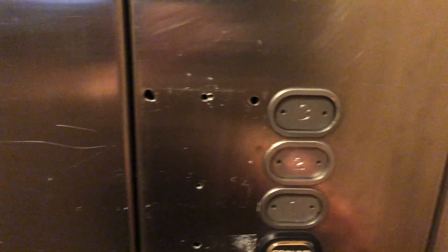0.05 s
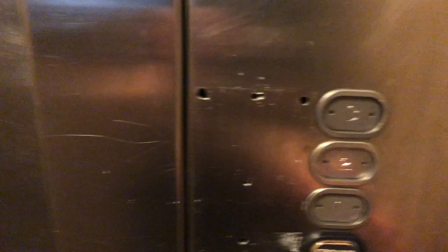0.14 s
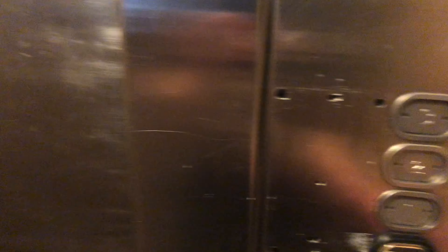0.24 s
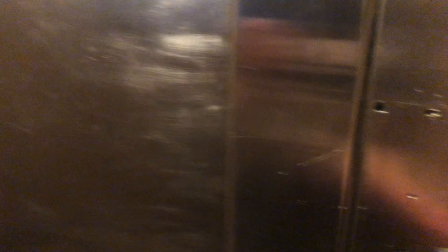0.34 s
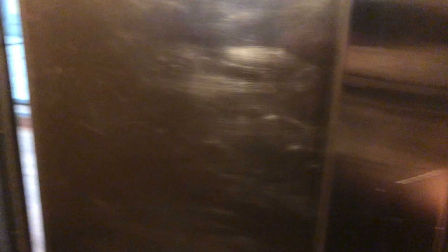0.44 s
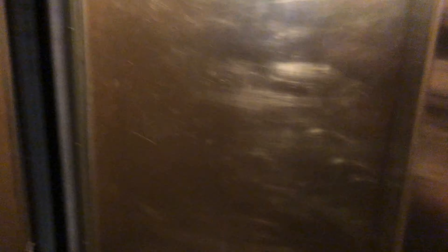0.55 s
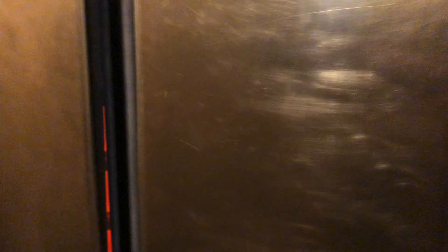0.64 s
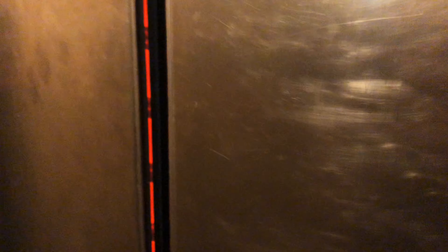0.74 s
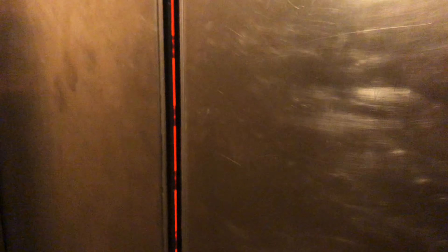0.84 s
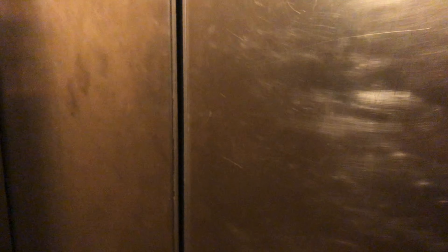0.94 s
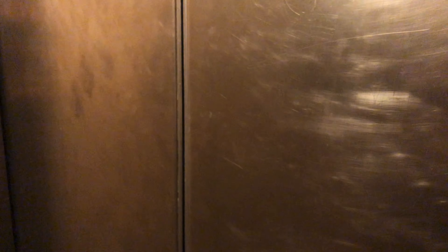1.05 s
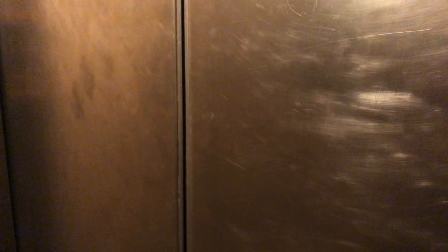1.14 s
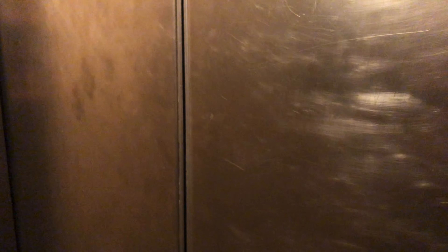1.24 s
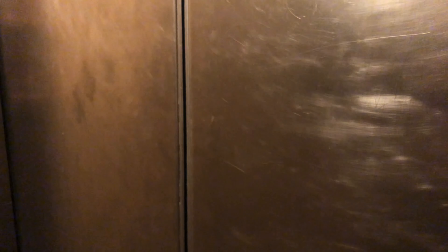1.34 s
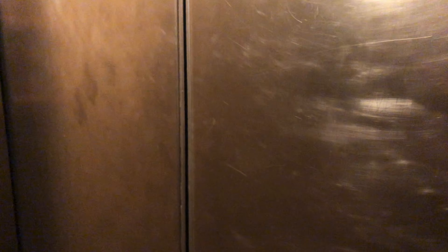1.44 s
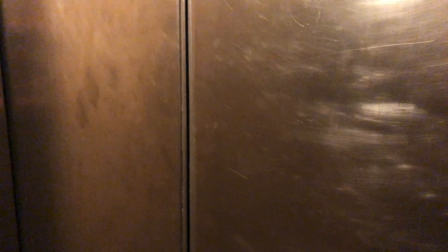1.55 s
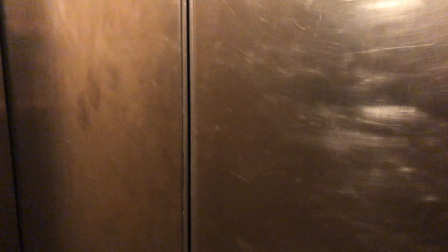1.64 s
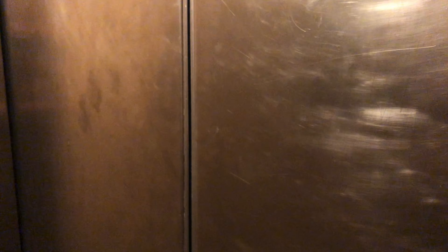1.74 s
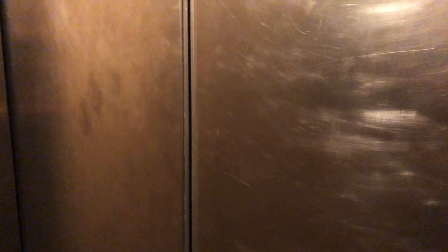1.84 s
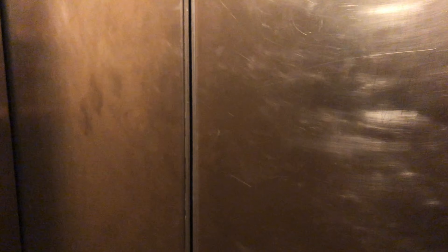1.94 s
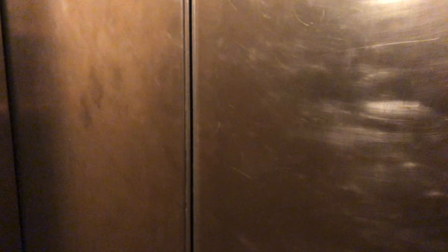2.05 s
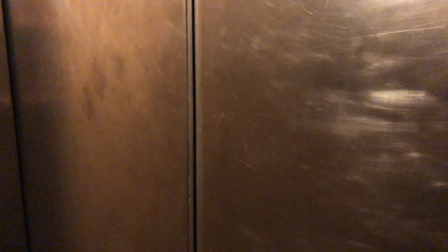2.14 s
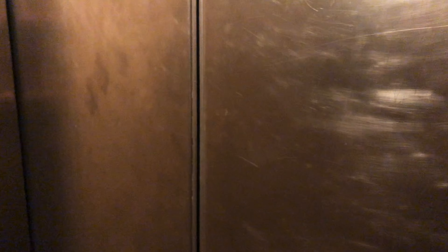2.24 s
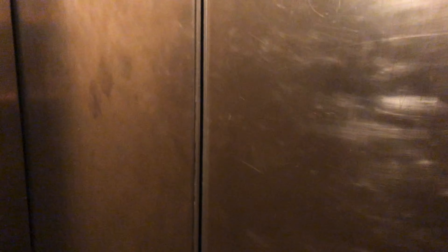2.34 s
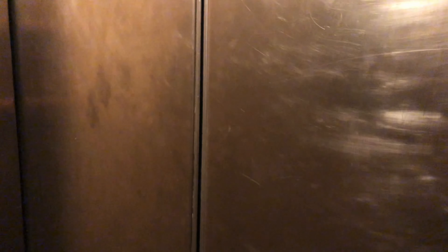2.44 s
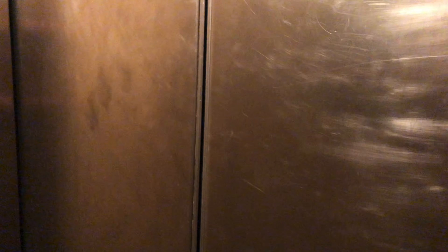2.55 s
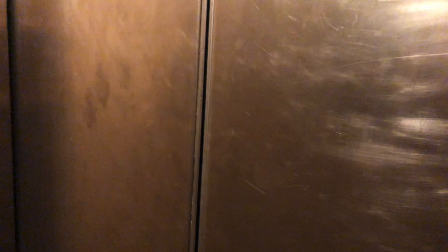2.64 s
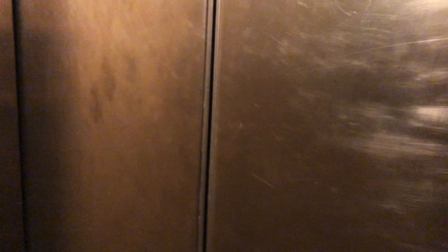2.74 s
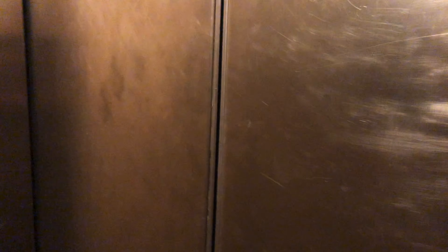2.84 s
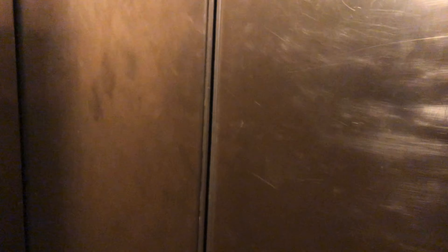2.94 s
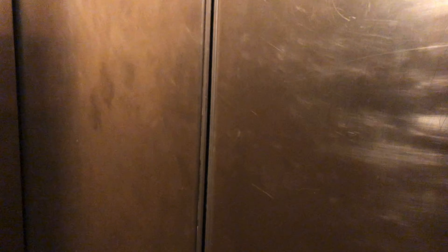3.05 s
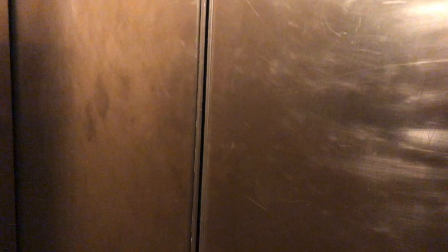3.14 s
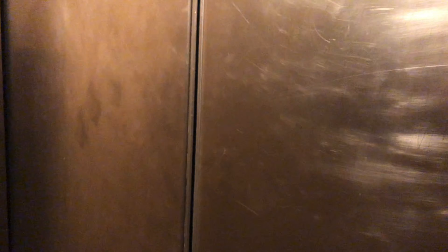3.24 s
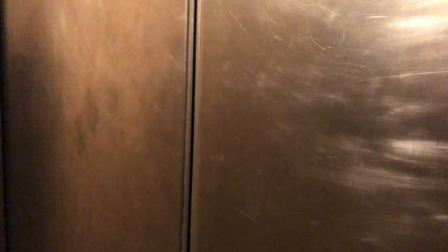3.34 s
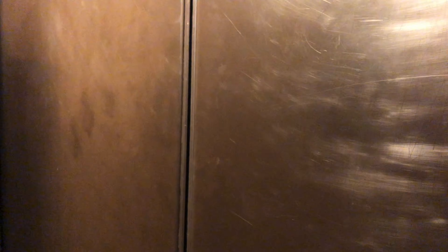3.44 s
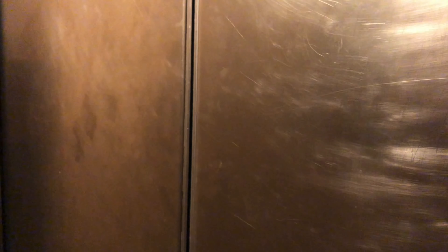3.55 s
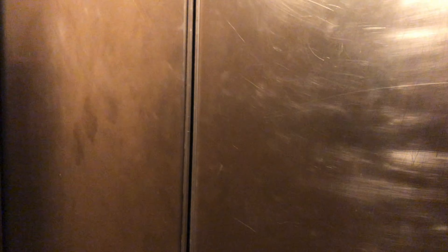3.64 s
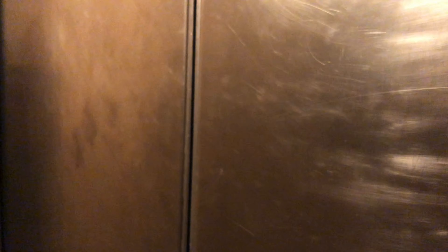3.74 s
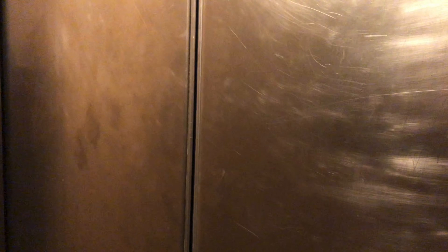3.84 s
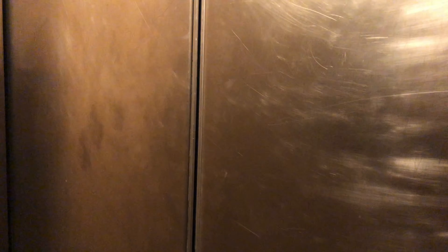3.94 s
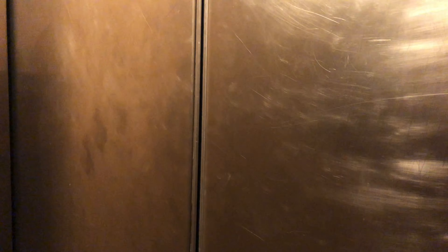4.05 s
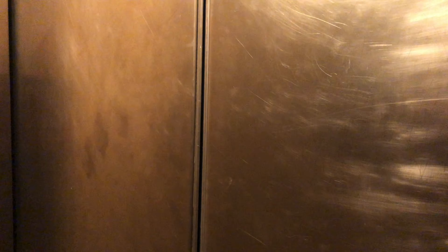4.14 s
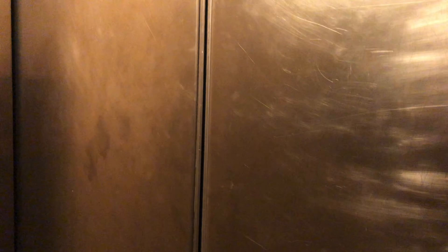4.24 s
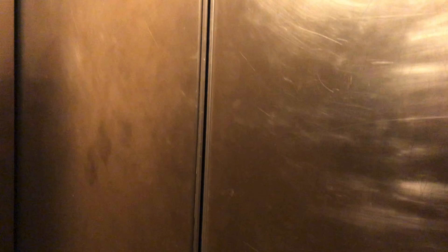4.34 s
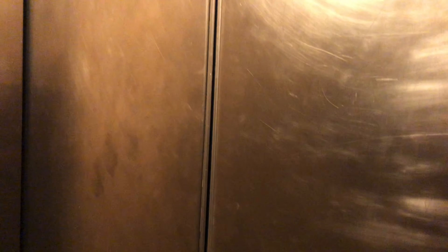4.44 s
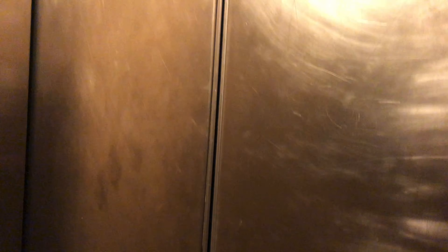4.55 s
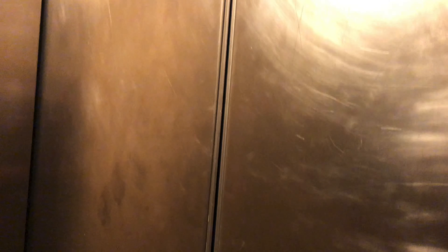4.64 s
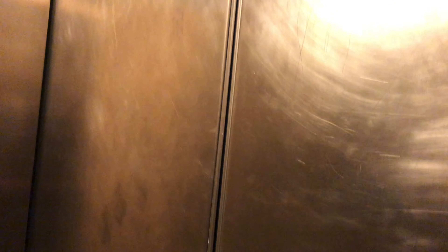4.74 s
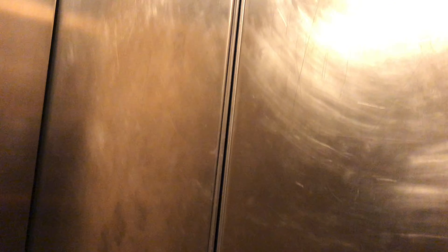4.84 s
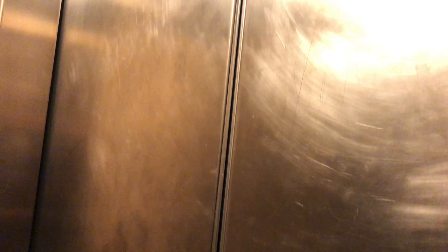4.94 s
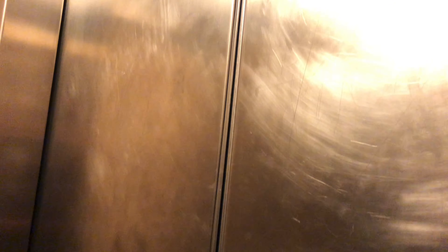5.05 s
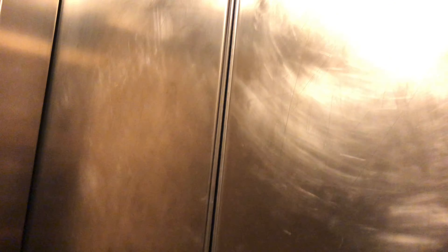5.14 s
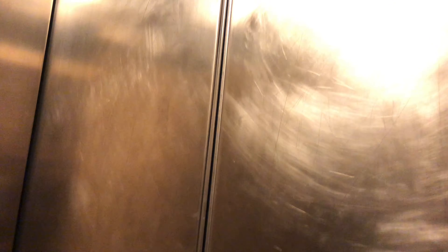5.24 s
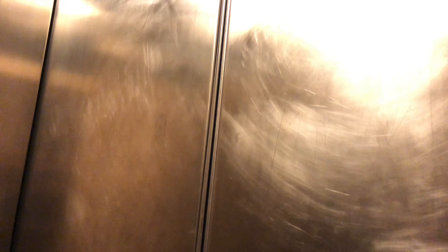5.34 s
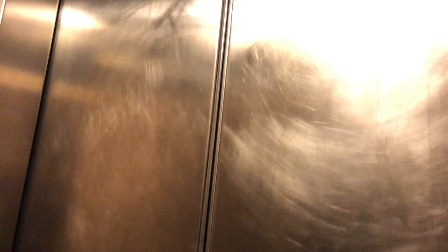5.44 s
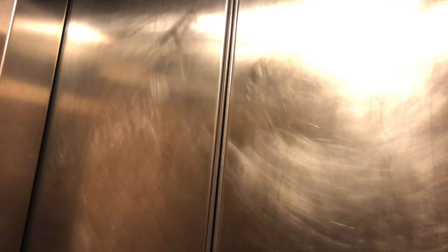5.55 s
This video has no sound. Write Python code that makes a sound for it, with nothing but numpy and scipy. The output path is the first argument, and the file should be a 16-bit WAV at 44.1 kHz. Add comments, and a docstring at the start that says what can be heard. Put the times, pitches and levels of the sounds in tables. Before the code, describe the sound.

Inside a small steel lift car, mono and close. From the start a sliding door rumbles with hollow boom, roller noise, track hiss and a faint belt note that peaks around 0.8 s. Metallic knocks and a catch snap fall at 0.1-0.5 s; light lever rattle begins at 0.9 s, the heaviest thump with a dry tick lands near 1.05 s, and bright snaps and clacks run from 1.16 to 1.4 s as it shuts. The rumble and motor hiss die away by about 2.5 s, with faint clicks and dull shaft thumps around 1.9-2.2 s. Quiet ventilation, wavering low hum and a very thin high whine remain, with a soft drone swelling near 2.8 and 3.3 s. An echoing switch click sounds at 3.2 s, a weaker clicking cluster with a thump at 3.4-3.65 s. At 4.4-4.7 s a distant metal scrape swells and rings. Low hum returns; a barely audible squeak starts at 5.5 s.

```python
"""A sliding steel lift door rumbles along its track, clicks, bumps shut; its catch snaps and rattles.
The door's running noise is coloured noise plus a belt tone; its blows are noise shaped by steel resonances,
with fading sine modes. Outside, switchgear clicks, thumps and scrapes echo in the shaft, and something
squeaks faintly at the end. Inside the car: ventilation noise, hum lines and a thin swept electrical whine."""
import sys
import numpy as np
from scipy import signal
from scipy.fft import rfft, irfft, next_fast_len
from scipy.io import wavfile
from scipy.ndimage import map_coordinates

SR = 44100
rng = np.random.default_rng(int(sys.argv[2]) if len(sys.argv) > 2 else 0)


def log_audio(samples):
    """Write samples as a 16-bit WAV file to the path given in sys.argv[1]."""
    # one column per channel
    frames = np.atleast_2d(samples).T
    # limit to full scale, then quantise
    limited = np.clip(frames, -1, 1)
    pcm = np.round(limited * 32767).astype(np.int16)
    wavfile.write(sys.argv[1], SR, pcm)


N = 246939
NOW_S = np.arange(N) / SR
AGE_S = np.arange(SR + SR // 2) / SR  # time since a blow
BLOW_HZ = np.fft.rfftfreq(len(AGE_S), 1 / SR)

# Noise colours, relative: (frequency [Hz], level [dB per Hz])
# ventilation
VENTILATION_COLOUR = [(22, -17.5), (49, -1.5), (87, 3), (147, -2.5), (217, -4.5), (250, -10), (356, -12),
                      (560, -17), (885, -24.5), (2260, -35.5), (9200, -45.5), (16000, -47.5)]
# door panel boom
BOOM_COLOUR = [(22, -41), (38, -16), (55, 6.5), (68, 4), (110, -15), (160, -59), (400, -86)]
# door rollers
ROLLER_COLOUR = [(60, -4), (120, 0.5), (150, 9.5), (185, -6.5), (220, 7), (260, -1), (440, -2.5),
                 (700, -9.5), (1000, -16), (2200, -91)]
# hiss on the track
TRACK_COLOUR = [(400, -23), (620, -7), (1200, 1), (1500, -3.5), (2050, -6), (2500, -8.5), (5000, -16),
                (7500, -25), (11000, -23), (12000, -32), (13000, -25), (16000, -30)]
# far strokes, before the rail resonances
STROKE_COLOUR = [(100, -16), (220, -2), (370, 12), (600, 5), (950, 1.5), (1300, -5), (2400, -5),
                 (4000, -2.5), (8000, 0.5), (15000, -1.5)]

# Resonances, relative to a flat base: (frequency [Hz], width [Hz], level [dB])
# door leaf
LEAF_PEAKS = [(430, 120, -1.5), (875, 29, 13.5), (1160, 69, 10.5), (1310, 85, 3), (1860, 480, 5),
              (2450, 1200, -1.5), (3360, 160, 4), (4040, 200, 5.5), (6060, 105, 7)]
# switchgear casing
CASING_PEAKS = [(880, 150, 0), (1326, 88, 3.5), (1800, 220, -2), (2800, 310, -5), (3660, 270, -1)]
# switchgear contact spring
SPRING_PEAKS = [(11400, 810, 1)]
# shaft rails
RAIL_PEAKS = [(870, 25, 1.5), (1080, 17, 3), (1455, 17, 9), (1587, 23, 11.5), (1890, 35, 7), (2120, 30, -1),
              (2276, 12, 9.5), (2396, 27, 7), (2570, 23, 7), (2780, 120, 3.5), (2970, 26, 3),
              (3395, 17, 10.5), (3490, 25, 10), (3800, 50, 1), (4130, 34, 3), (5700, 160, -4)]

# Ringing modes: (frequency [Hz], relative level [dB], t60 [s])
# steel catch
CATCH_MODES = [(3310, -3, 0.27), (3670, -3, 0.15), (8120, 6, 0.12), (8550, 6, 0.12), (9630, 0.5, 0.099),
               (11750, 0, 0.09)]
# light lever
LEVER_MODES = [(5100, -7, 0.071), (5600, 1, .13), (5610, 4.5, 0.13), (6000, -6, 0.13), (7770, -3.5, 0.15),
               (9450, 1, 0.096), (14600, -14, .15)]

# Decay times: (frequency [Hz], t60 [s])
# inside the car
CAR_T60 = [(100, 0.061), (500, 1), (2000, 0.2), (6000, 0.22), (14000, 0.13)]
# in the shaft
SHAFT_T60 = [(150, 1.08), (1500, 0.9), (3400, 0.73), (4600, 0.62), (7000, 0.42), (14000, 0.2)]

# steady hum lines: (frequency [Hz], level [dB])
HUM_LINES = [(86.1, -62.5), (212, -62.5), (495, -72), (860, -78.5)]
# spells of stronger hum: (start [s], end [s], frequency [Hz], level [dB])
HUM_SPELLS = [(1.8, 2.414, 219, -54.5), (2.0, 2.41, 487.5, -65.5), (4.64, 4.845, 218.2, -57),
              (4.996, 5.403, 206.2, -57.5)]
# slow swells of drone from the car walls: (time [s], level [dB])
DRONES = [(2.83, -53), (3.28, -47), (3.87, -58.5)]
# faint squeak, second and third partial only: (time [s], fundamental [Hz], level per partial [dB])
SQUEAK = (5.525, 975, -76.5)
# drawn-out strokes far along the shaft:
# (time [s], level [dB], rise [s], hold [s], top [Hz], rail ring share [gain], strongest near [Hz])
STROKES = [(1.979, -47, 0.011, 0.097, 1130, 0.91, 367), (2.17, -56, 0.023, 0.055, 1100, 0.5, 556),
           (3.634, -49.5, 0.014, 0.021, 1500, 0.54, 930), (4.394, -47.5, 0.045, 0.076, 1990, 0.77, 1670),
           (4.477, -37, 0.11, 0.063, 8500, 1.27, 2270)]
# switchgear clicks: (time [s], level [dB], hardness [dB], armature ring [Hz], relative ring level [dB])
GEAR_CLICKS = [(1.912, -64, -16.5, 4140, -11), (1.972, -65, -6, 4060, -6), (3.190, -43, 2.5, 4140, 4),
               (3.443, -64, 5.5, 3980, 5), (3.587, -67.5, 6.5, 4440, 2), (3.625, -56.5, 5, 4290, 10),
               (3.629, -49, -10, 4190, 1), (3.655, -54.5, 1.5, 4460, 4.5)]
# door leaf on its track and frame: (time [s], level [dB], hardness [dB])
KNOCKS = [(0.105, -52, -10.5), (0.178, -42.5, 0.5), (0.375, -45.5, -9.5), (0.470, -49, 10),
          (0.487, -40.5, 3), (0.714, -52.5, -2), (1.021, -52.5, -12), (1.04, -50.5, -20),
          (1.060, -34.5, 5.5), (1.323, -41, 2), (1.356, -40.5, -3)]
# catch snaps: (time [s], level [dB], ring against the clack [dB], rise [s])
CATCH_SNAPS = [(0.374, -37.5, -2.5, 0.0014), (1.160, -34.5, -5.5, 0.00046), (1.281, -39, -11, 0.0028)]
# lever rattle: (time [s], level [dB], ring against the clack [dB], rise [s])
LEVER_TAPS = [(0.914, -49, -9, 0.0054), (0.949, -45.5, -17, 0.00064), (1.003, -52, -16, 0.0049),
              (1.250, -39.5, -3.5, 0.0016), (1.352, -50.5, 3.5, 0.00062), (1.394, -52, -3, 0.00085)]
# single-pitch rings and thumps of the door, sounding with the knocks and lever taps:
# (time [s], level [dB], frequency [Hz], t60 [s])
DOOR_RINGS = [(0.488, -42.5, 3520, .24), (0.948, -46, 7800, .14), (1.046, -28, 322, 0.052),
              (1.324, -28.5, 2260, 0.038), (1.330, -29, 427.5, .11)]
# dry tick close by: (time [s], level [dB], t60 [s])
TICK = (1.0385, -33.5, .018)
# hollow door shaking, getting going and shutting: (time [s], length [s], boom [dB], rumble [dB])
SHAKES = [(0.053, 0.37, -41.5, -71), (1.162, 0.18, -42, -38.5)]
# thin motor hiss as it pulls away: (centre [Hz], level [dB], full until [s])
PULL_AWAY_HISS = (11900, -73, .4)

# Contact character against the clack: (thud [dB], crack [dB])
# door leaf
LEAF_TOUCH = (-5, -11.5)
# catch
CATCH_TOUCH = (-15, 2.8)
# lever
LEVER_TOUCH = (-14, -0.73)
# switchgear
GEAR_TOUCH = (-8, -5.5)

TOP_HZ = 15950
MAINS_HZ, WHINE_HZ, WHINE_DB = 50, 10335, -78.5
SWEEP_HZ = 100  # whine pitch swing either way in each mains cycle
WALL_DELAY_S, DRIFT_KNOTS_PER_S = 0.008, 2.2
SPELL_RISE_S, SPELL_T60_S = 0.019, 0.55
DRONE_WIDTH_S = 0.14
RUSTLE_S, RUSTLE_DB, RUSTLE_WIDTH_S = 2.73, -71.5, 0.32
FOCUS_WIDTH_HZ, FOCUS_DB = 280, 7  # band each stroke excites most
SPILL_DB = -12  # soft contact: shelf reaching an octave above its top
CASING_TILT = 0.53  # dB the lowest modes lose per dB of hardness
ARMATURE_WIDTH_HZ = 210
ARMATURE_DB, ARMATURE_T60_S, ARMATURE_RISE_S = -5.5, 0.42, 0.008
KNOCK_RISE_S, GEAR_RISE_S = 0.00253, 0.00275  # strongest of each kind
SOFTEN_DB = 99  # a blow this much weaker takes one more rise time
LEAF_DIRECT, LATCH_DIRECT, GEAR_DIRECT = 0.9, 1.25, 0.32  # extra gain at the onset
DOOR_RING_RISE_S, DOOR_RING_BLUR_RAD = 0.003, 1.3
ROLL_DB, HISS_DB, DRIVE_DB = -44, -53, -65.5
RECEDE_DB_PER_S, HISS_RECEDE_DB_PER_S = 3.5, 4  # running gear moves away along the track
STOP_S, STOP_T60_S = 1.3, 1.55
PRESS_DB, MOTOR_OFF_S, MOTOR_T60_S = -64.5, 1.88, 0.92  # motor hisses on, pressing the door shut, until cut
DRIVE_HZ, SPEED_UP_HZ = 1750, 150
FASTEST_S, FAST_WIDTH_S, FASTEST_DB = 0.77, 0.35, 3  # belt highest and loudest in mid-travel
DRIVE_WIDTH_HZ, DRIVE_RASP_DB = 380, 5.5  # rasp around the belt note, level against the note
SHAKE_RISE_S, SHAKE_T60_S = 0.01, 0.99


def amp(db):
    """Decibels to gain."""
    return 10 ** (np.asarray(db) / 20)


def unit(x):
    """Scale to rms 1."""
    return x / np.sqrt(np.mean(x ** 2) + 1e-20)


def along(points, hz):
    """(Hz, value) points interpolated on a log-frequency axis."""
    point_hz, values = np.transpose(points)
    return np.interp(np.log(hz + 1), np.log(point_hz), values)


def wobble(knots_per_s, size=N):
    """Smooth random curve through normally distributed knots."""
    coarse = np.arange(0, size + 64, 64)
    knots = rng.standard_normal(4096)
    curve = map_coordinates(knots, [coarse * knots_per_s / SR], mode="mirror")
    return np.interp(np.arange(size), coarse, curve)


def filtered(x, response):
    """Multiply the spectrum of x by a response of frequency."""
    padded = next_fast_len(len(x) + 4096)
    gain = response(np.fft.rfftfreq(padded, 1 / SR))
    return irfft(rfft(x, padded) * gain, padded)[:len(x)]


def noise(colour, size=N):
    """Noise of rms 1 with a (Hz, dB) colour."""
    return unit(filtered(rng.standard_normal(size), lambda hz: amp(along(colour, hz))))


def tone(hz, blur_rad):
    """Line of rms 1 whose wavering phase smears it into a narrow band."""
    phase = 2 * np.pi * np.cumsum(hz * np.ones(N)) / SR
    return np.sqrt(2) * np.sin(phase + blur_rad * wobble(110))


def band(hz, width_hz):
    """Narrow noise band of rms 1 around a pitch that may move."""
    phase = 2 * np.pi * np.cumsum(hz * np.ones(N)) / SR
    return unit(wobble(width_hz) * np.cos(phase) + wobble(width_hz) * np.sin(phase))


def add(track, time_s, sound):
    """Mix a sound into the track."""
    part = track[max(round(time_s * SR), 0):][:len(sound)]
    part += sound[:len(part)]


def swell(rise_s):
    """Contact builds up exponentially, with the rise as time constant."""
    return 1 - np.exp(-AGE_S / max(rise_s, 1e-4))


def direct(boost):
    """First milliseconds arrive straight from the contact, above the reverberation."""
    return 1 + boost * np.exp(-AGE_S / 0.0017)


def release(end_s, t60_s):
    """Full level until the end, then a steady fall in dB."""
    return amp(-60 * np.maximum(NOW_S - end_s, 0) / t60_s)


def gate(start_s, end_s, rise_s, t60_s):
    """Attack from the start, hold until the end, then release."""
    attack = 1 - np.exp(-np.maximum(NOW_S - start_s, 0) / max(rise_s, 1e-4))
    return attack * release(end_s, t60_s)


def hump(peak_s, width_s):
    """Smooth rise and fall."""
    return np.exp(-((NOW_S - peak_s) / width_s) ** 2)


def resonances(peaks, hz, base):
    """Gain of (Hz, width, dB) peaks added in power to a flat base."""
    power = base ** 2
    for centre_hz, width_hz, db in peaks:
        power = power + amp(2 * db) / (1 + (2 * (hz - centre_hz) / width_hz) ** 2)
    return np.sqrt(power)


def dense_modes(spacing_hz, depth_db):
    """Close random peaks and dips of one sheet-metal part, as gain over frequency."""
    knots = rng.standard_normal(1024)
    return amp(depth_db * map_coordinates(knots, [BLOW_HZ / spacing_hz], mode="mirror"))


def levels(touch, db, hardness_db=0):
    """Clack, thud and crack levels in dB: hard contact trades thud for crack."""
    thud_db, crack_db = touch
    return db, db + thud_db - hardness_db, db + crack_db + hardness_db


def slowness(rows, db):
    """Rise factor: the weaker a blow among its kind, the softer its attack."""
    strongest_db = max(row[1] for row in rows)
    return 1 + (strongest_db - db) / SOFTEN_DB


def blow(clack_db, thud_db, crack_db, body, sheet):
    """Dense vibration of struck metal: low thud, mid clack coloured by the body, bright crack."""
    thud_colour = [(40, -7), (130, 2.0), (450, -6.5), (750, -11.5), (3000, -29.5)]
    clack_colour = [(250, -46), (900, -2), (2500, 6.0), (5500, -1.0), (8000, -5.5), (16000, -48)]
    crack_colour = [(1500, -61), (5000, -3.5), (7200, -7.5), (8400, -2.5), (11500, -5.0),
                    (13000, -9), (16000, -9.5)]
    thud = unit(amp(along(thud_colour, BLOW_HZ)))
    clack = unit(sheet * body(BLOW_HZ) * amp(along(clack_colour, BLOW_HZ)))
    crack = unit(sheet * amp(along(crack_colour, BLOW_HZ)))
    gain = np.linalg.norm([amp(thud_db) * thud, amp(clack_db) * clack, amp(crack_db) * crack], axis=0)
    vibration = irfft(rfft(rng.standard_normal(len(AGE_S))) * gain, len(AGE_S))
    # rebounds and wall reflections arrive in lumps
    chatter = amp(1.6 * wobble(245, size=len(AGE_S)))
    return chatter * vibration


def die_away(x, shaft_db, hold_s=0):
    """After the hold, each frequency dies fast in the car and lingers in the shaft."""
    hz, frame_s, spectra = signal.stft(x, SR, nperseg=256)
    fading_s = np.maximum(frame_s - hold_s, 0)
    near = amp(-60 * fading_s / along(CAR_T60, hz)[:, None])
    far = amp(-60 * fading_s / along(SHAFT_T60, hz)[:, None])
    decay = np.hypot(near, amp(shaft_db) * far) / np.hypot(1, amp(shaft_db))
    return signal.istft(spectra * decay, SR, nperseg=256)[1][:len(x)]


def ring(modes, blur_rad):
    """Fading modes at randomly varied strengths; crossing reflections make their phases wander."""
    out = np.zeros(len(AGE_S))
    for hz, db, t60_s in modes:
        age_s = AGE_S[:int(t60_s * SR) + 1]
        level_db = db + rng.normal(0, 1.5) - 60 * age_s / t60_s
        phase = 2 * np.pi * hz * age_s + blur_rad * wobble(106.7, size=len(age_s))
        out[:len(age_s)] += amp(level_db) * np.sin(phase)
    return out


def soft_contact(hz, top_hz):
    """Gain of a soft contact: flat up to the top, weak shelf for an octave beyond."""
    shelf = amp(SPILL_DB) / np.hypot(1, (hz / (2 * top_hz)) ** 7)
    return 1 / np.hypot(1, (hz / top_hz) ** 7) + shelf


def idle():
    """Ventilation noise, wavering hum lines that come and go, swelling drone, passing faint hiss."""
    air = amp(-51.0) * noise(VENTILATION_COLOUR)
    hum = sum(amp(db) * band(hz, width_hz=22) for hz, db in HUM_LINES)
    for start_s, end_s, hz, db in HUM_SPELLS:
        spell = gate(start_s, end_s, SPELL_RISE_S, SPELL_T60_S) * tone(hz, blur_rad=0.12)
        hum = hum + amp(db + 0.53 * wobble(8.3)) * spell
    swells = sum(amp(db) * hump(time_s, DRONE_WIDTH_S) for time_s, db in DRONES)
    drone = swells * noise([(70, -47), (150, 4.0), (220, -15.5), (350, -9.0), (900, -69)])
    rustle = hump(RUSTLE_S, RUSTLE_WIDTH_S) * noise([(800, -9), (3000, 15.0), (16000, 8)])
    return air + hum + drone + amp(RUSTLE_DB) * rustle


def supply_path(delay_s, shift_rad):
    """Lamp supply oscillator along one path: swept afresh and pulsing in every mains cycle."""
    cycle = (NOW_S - delay_s) * MAINS_HZ % 1
    swing = np.cos(2 * np.pi * cycle)
    phase = (2 * np.pi * WHINE_HZ * cycle + SWEEP_HZ * swing) / MAINS_HZ
    return (1 - 0.95 * swing) * np.sin(phase + shift_rad)


def whine():
    """Supply whine plus one wall echo of drifting phase, so that it shimmers."""
    echo = 0.5 * supply_path(WALL_DELAY_S, np.pi * wobble(DRIFT_KNOTS_PER_S))
    return amp(WHINE_DB) * (supply_path(0, 0) + echo)


def squeak():
    """Something begins to squeak faintly outside the car: two blurred partials."""
    time_s, hz, db = SQUEAK
    fade_in = np.clip((NOW_S - time_s) / 0.02, 0, 1)
    partials = tone(2 * hz, blur_rad=1.6) + tone(3 * hz, blur_rad=2)
    return amp(db + 2 * wobble(30)) * fade_in * partials


def far_strokes():
    """Distant thumps and a metal scrape swell softly and ring on in the shaft; soft contact is dull."""
    out = np.zeros(N)
    for time_s, db, rise_s, hold_s, top_hz, share, focus_hz in STROKES:
        def steel(hz):
            """Rail ring, band of strongest excitation and contact softness."""
            rail = 0.37 + share * resonances(RAIL_PEAKS, hz, base=0)
            focus = resonances([(focus_hz, FOCUS_WIDTH_HZ, FOCUS_DB)], hz, base=1)
            return rail * soft_contact(hz, top_hz) * focus

        rub = unit(filtered(noise(STROKE_COLOUR, size=len(AGE_S)), steel))
        add(out, time_s, amp(db) * swell(rise_s) * die_away(rub, shaft_db=8.0, hold_s=hold_s))
    return out


def gear_clicks():
    """Switchgear clicks with strong shaft echo; armatures ring, soft blows favour low casing modes."""
    out = np.zeros(N)
    for time_s, db, hardness_db, ring_hz, ring_db in GEAR_CLICKS:
        def casing(hz):
            """Casing and armature peaks, tilted by hardness."""
            tilt = amp(along([(900, -CASING_TILT * hardness_db), (4000, 0)], hz))
            return tilt * resonances([*CASING_PEAKS, (ring_hz, ARMATURE_WIDTH_HZ, ring_db)], hz, base=0.32)

        sheet = dense_modes(spacing_hz=70, depth_db=3) * resonances(SPRING_PEAKS, BLOW_HZ, base=1)
        struck = blow(*levels(GEAR_TOUCH, db, hardness_db), casing, sheet)
        click = die_away(struck, shaft_db=-4.5, hold_s=0.015)
        rise_s = GEAR_RISE_S * slowness(GEAR_CLICKS, db)
        add(out, time_s, swell(rise_s) * direct(GEAR_DIRECT) * click)
        # narrow ring that outlasts the click
        armature = ring([(ring_hz, db + ring_db + ARMATURE_DB, ARMATURE_T60_S)], blur_rad=1.9)
        add(out, time_s, swell(ARMATURE_RISE_S) * armature)
    return out


def leaf_body(hz):
    """Resonances of the steel door leaf."""
    return resonances(LEAF_PEAKS, hz, base=0.9)


def door_contacts():
    """Leaf, catch and lever blows ring the steel leaf and their own modes, with single-pitch door rings."""
    out = np.zeros(N)
    sheet = dense_modes(spacing_hz=70, depth_db=3)

    def strike(levels_db, rise_s, boost, part=0):
        """One blow on the leaf, with the ring of the part that struck it."""
        knock = die_away(blow(*levels_db, leaf_body, sheet), shaft_db=-11.0)
        return swell(rise_s) * direct(boost) * (knock + part)

    for time_s, db, hardness_db in KNOCKS:
        rise_s = KNOCK_RISE_S * slowness(KNOCKS, db)
        add(out, time_s, strike(levels(LEAF_TOUCH, db, hardness_db), rise_s, LEAF_DIRECT))
    for time_s, db, ring_db, rise_s in CATCH_SNAPS:
        catch = amp(db + ring_db) * ring(CATCH_MODES, blur_rad=1.0)
        add(out, time_s, strike(levels(CATCH_TOUCH, db), rise_s, LATCH_DIRECT, catch))
    for time_s, db, ring_db, rise_s in LEVER_TAPS:
        lever = amp(db + ring_db) * ring(LEVER_MODES, blur_rad=0.94)
        add(out, time_s, strike(levels(LEVER_TOUCH, db), rise_s, LATCH_DIRECT, lever))
    for time_s, db, hz, t60_s in DOOR_RINGS:
        add(out, time_s, swell(DOOR_RING_RISE_S) * ring([(hz, db, t60_s)], DOOR_RING_BLUR_RAD))
    time_s, db, t60_s = TICK
    tick = noise([(2000, -12), (4000, 1), (7000, -5), (12000, 1)], size=len(AGE_S))
    add(out, time_s, amp(db - 60 * AGE_S / t60_s) * tick)
    return out


def belt_drive(running):
    """Belt note with a rasp around it, highest and loudest in mid-travel."""
    speed = hump(FASTEST_S, FAST_WIDTH_S)
    hz = DRIVE_HZ + SPEED_UP_HZ * speed
    note = tone(hz + 18 * wobble(14), blur_rad=1.0)
    rasp = amp(DRIVE_RASP_DB) * band(hz, DRIVE_WIDTH_HZ)
    return running * amp(DRIVE_DB + FASTEST_DB * speed + 1.1 * wobble(21.9)) * (note + rasp)


def door_run():
    """Belt sings, motor hisses; rollers rumble and hiss on the track and shake the hollow door."""
    running = release(STOP_S, STOP_T60_S)
    boom_gain = 0
    roll_gain = amp(ROLL_DB - RECEDE_DB_PER_S * NOW_S) * running
    for time_s, length_s, boom_db, roll_db in SHAKES:
        shake = gate(time_s, time_s + length_s, SHAKE_RISE_S, SHAKE_T60_S)
        boom_gain = np.hypot(boom_gain, amp(boom_db) * shake)
        roll_gain = np.hypot(roll_gain, amp(roll_db) * shake)
    track_gain = amp(HISS_DB - HISS_RECEDE_DB_PER_S * NOW_S) * running
    press_gain = amp(PRESS_DB) * release(MOTOR_OFF_S, MOTOR_T60_S)
    unevenness = wobble(21.88)  # shared by rollers and track
    boom = boom_gain * noise(BOOM_COLOUR)
    roll = roll_gain * amp(2.25 * unevenness) * noise(ROLLER_COLOUR)
    hiss = np.hypot(track_gain, press_gain) * amp(1.0 * unevenness) * noise(TRACK_COLOUR)
    hiss_hz, hiss_db, until_s = PULL_AWAY_HISS
    pull_away = amp(hiss_db) * release(until_s, MOTOR_T60_S) * band(hiss_hz, width_hz=600)
    return boom + roll + hiss + belt_drive(running) + pull_away


def scene():
    """Everything heard from inside the car, one channel."""
    background = idle() + whine() + squeak()
    shaft = far_strokes() + gear_clicks()
    door = door_contacts() + door_run()
    return (background + shaft + door)[None]


def record(dry):
    """Sharp band limit: nothing passes above the top frequency."""
    return np.array([filtered(channel, lambda hz: hz < TOP_HZ) for channel in dry])


dry = scene()
out = record(dry)
log_audio(out)
```